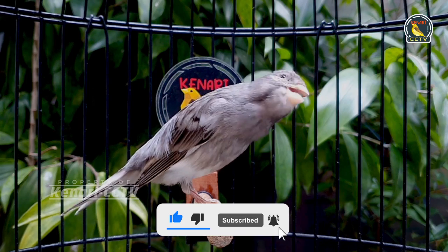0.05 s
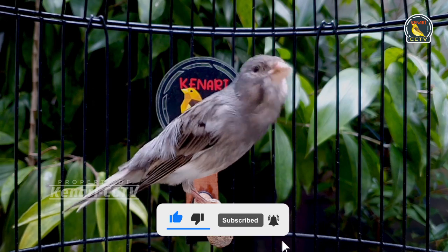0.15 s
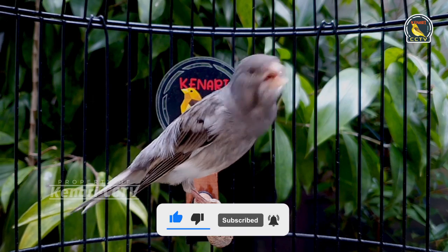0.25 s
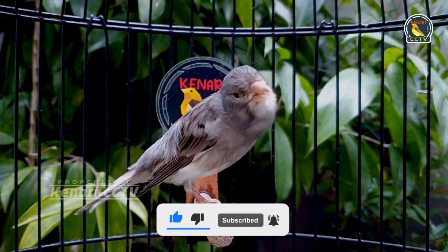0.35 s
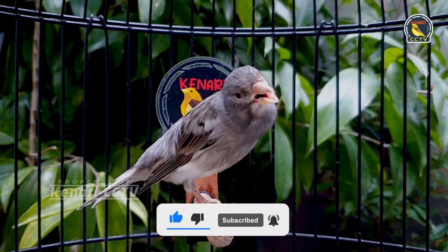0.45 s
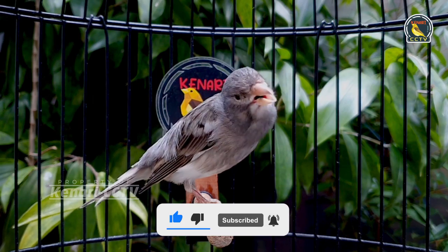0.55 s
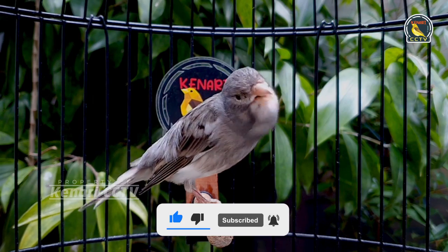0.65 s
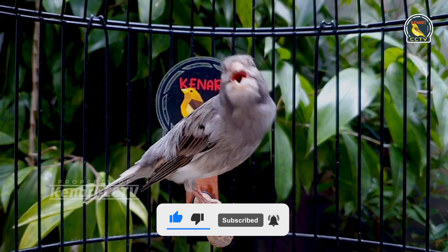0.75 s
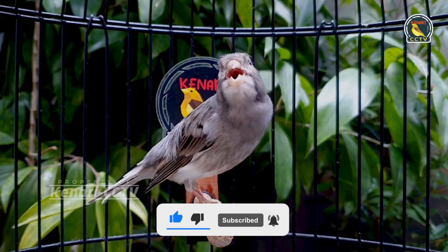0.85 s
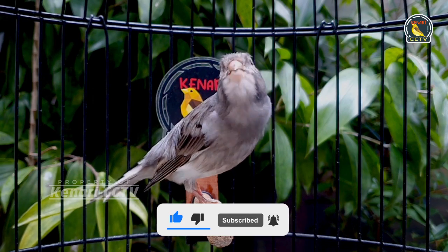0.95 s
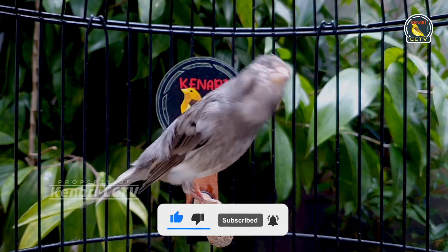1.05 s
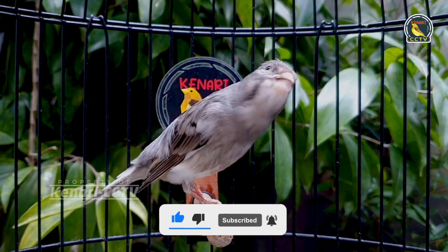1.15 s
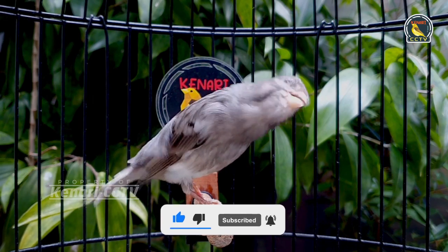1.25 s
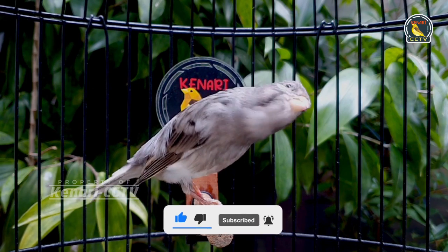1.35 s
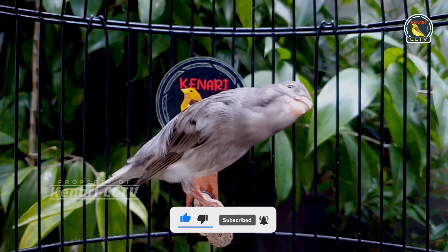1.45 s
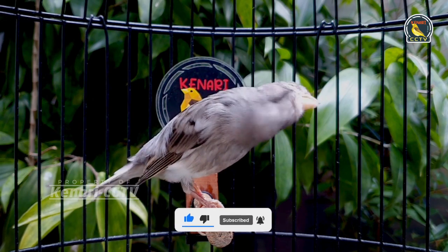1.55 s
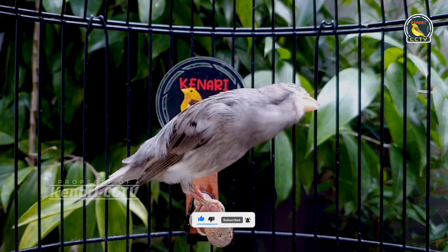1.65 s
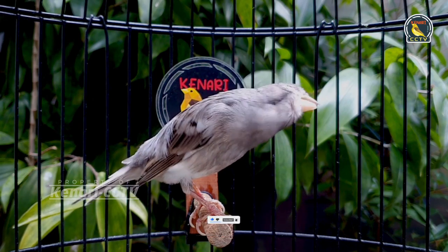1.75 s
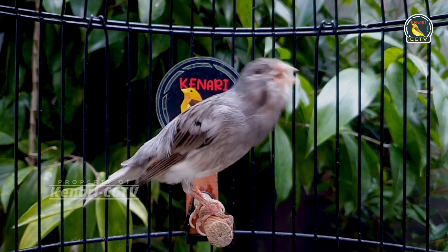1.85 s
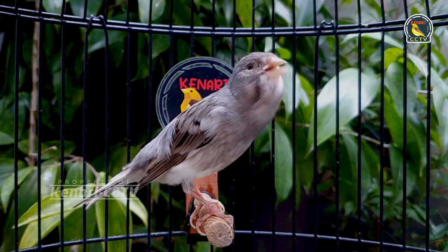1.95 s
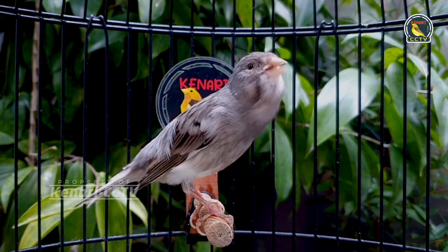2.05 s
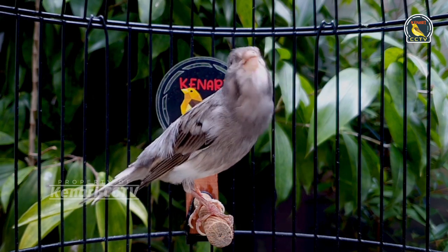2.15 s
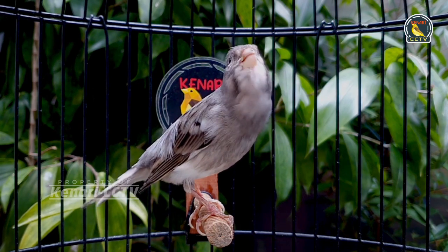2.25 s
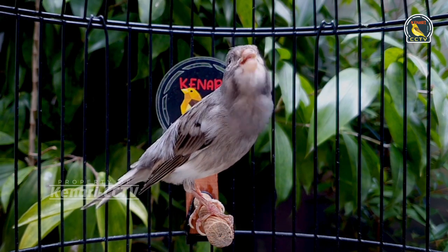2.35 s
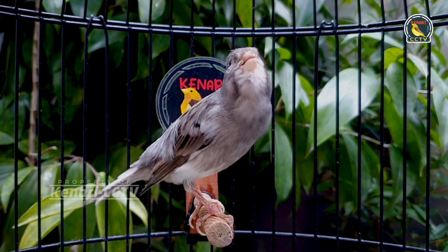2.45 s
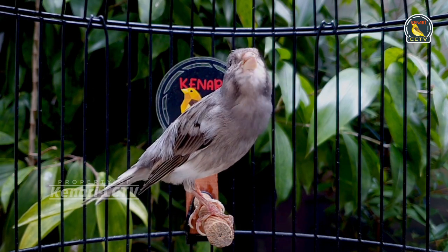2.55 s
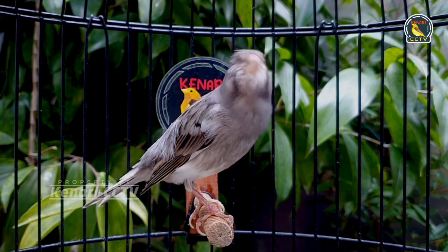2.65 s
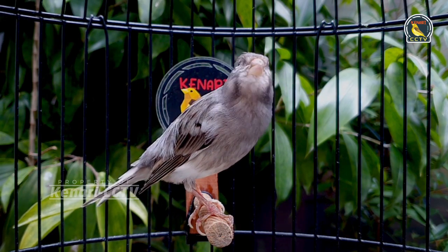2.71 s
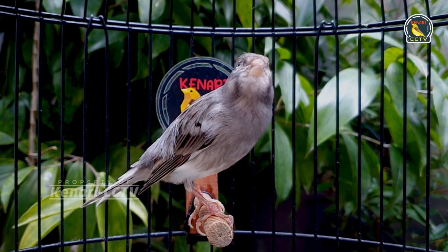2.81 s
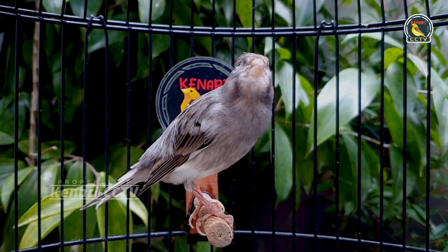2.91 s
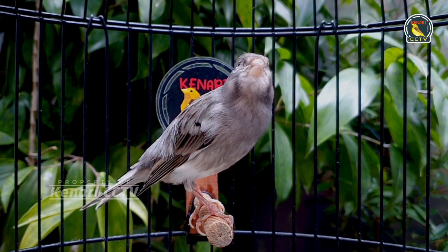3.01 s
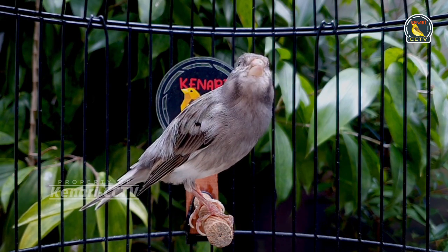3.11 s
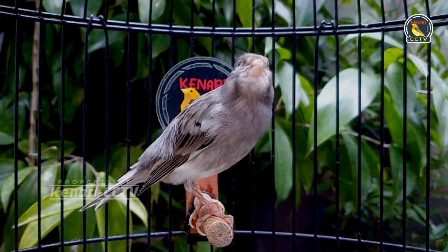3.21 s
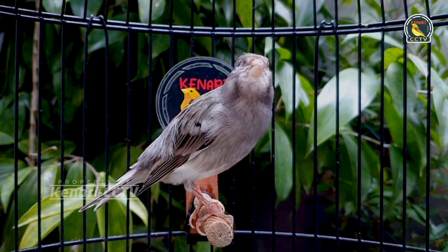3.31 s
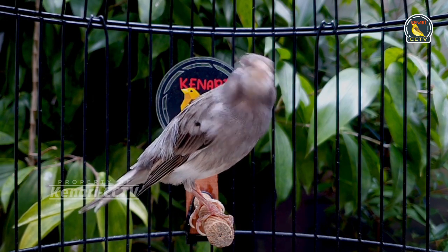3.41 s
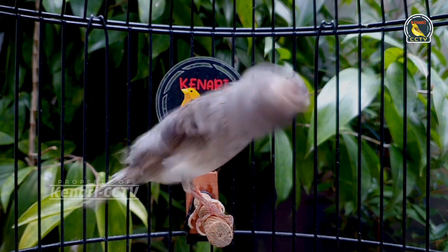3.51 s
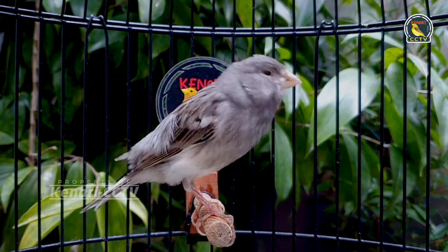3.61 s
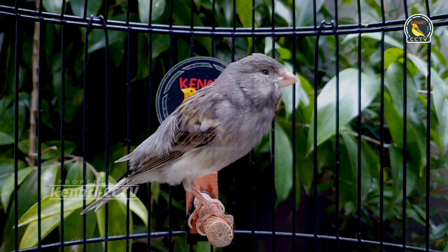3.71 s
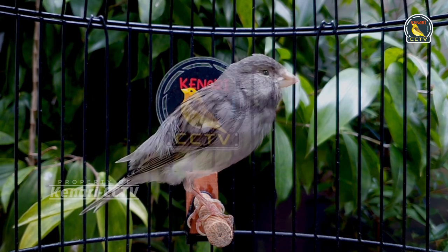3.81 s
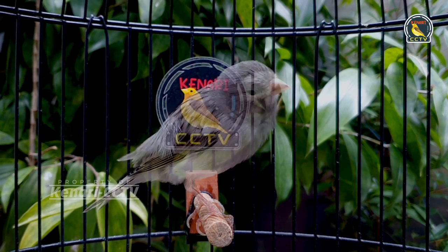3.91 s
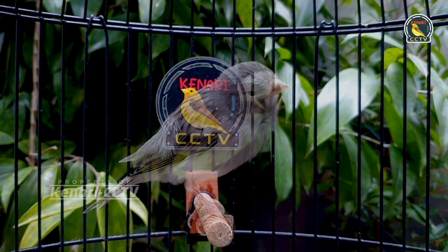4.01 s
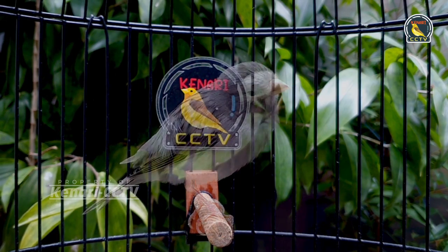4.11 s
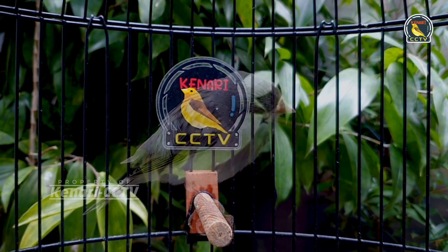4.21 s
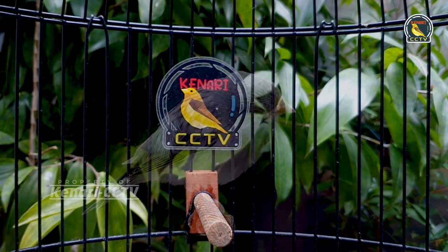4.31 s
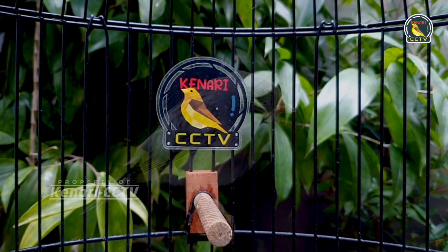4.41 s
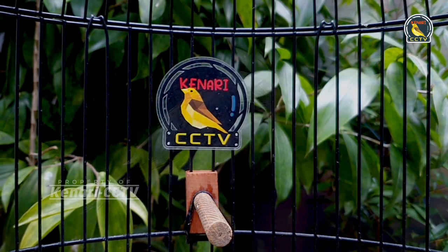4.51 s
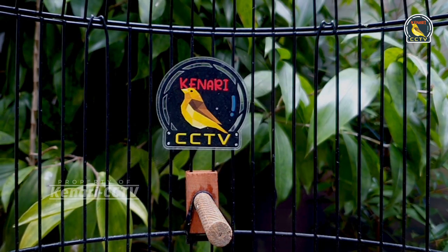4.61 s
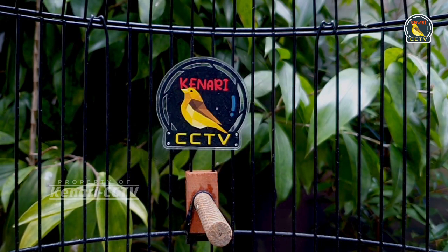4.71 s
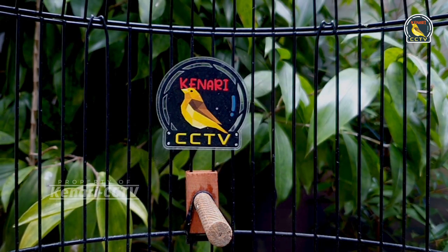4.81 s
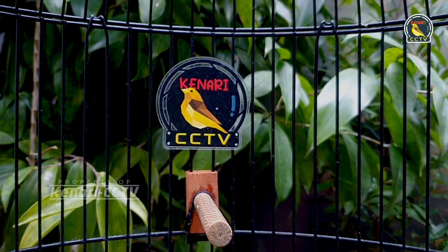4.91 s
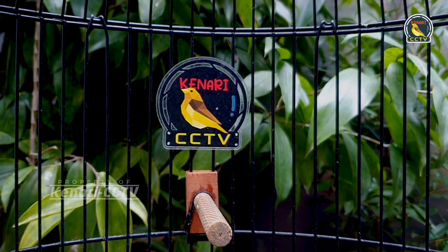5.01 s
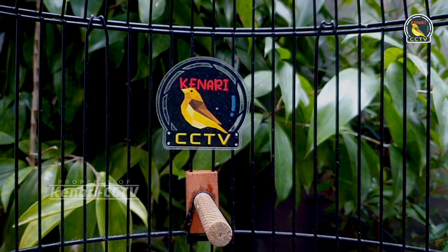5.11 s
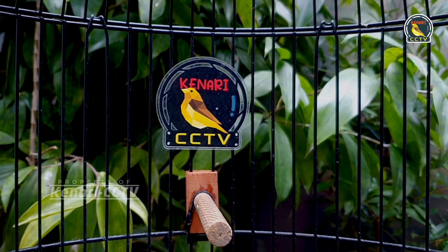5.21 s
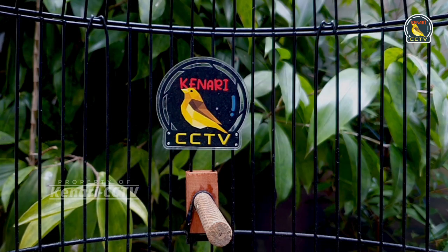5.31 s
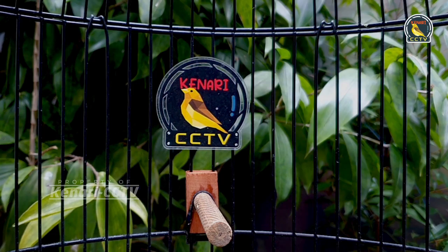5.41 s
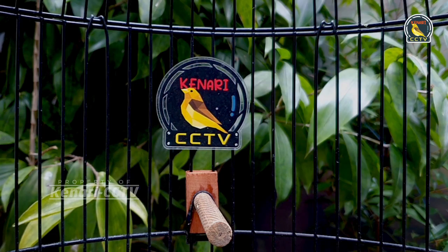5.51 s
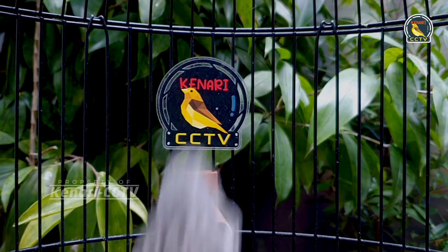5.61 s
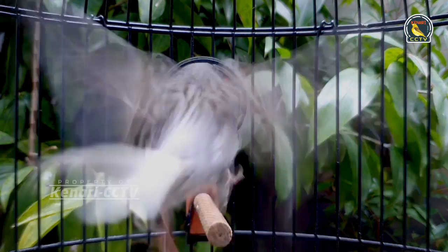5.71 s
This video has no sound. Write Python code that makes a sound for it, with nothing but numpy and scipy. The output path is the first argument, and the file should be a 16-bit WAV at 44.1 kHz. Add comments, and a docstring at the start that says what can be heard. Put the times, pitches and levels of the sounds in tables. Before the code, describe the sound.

A canary sings close by with falling sweeps and quick trills, then come dull cage knocks, a hoarse rising call and flapping wings.

```python
"""A canary sings close to the microphone, in a cage in a small, echoing room. Its voice organ makes
almost pure, gliding tones: falling sweeps, chips, a slow and a fast trill, a squeak and a held whistle.
In the pause the cage rustles, and knocks set its frame and wires ringing. Then come a hoarse rising
call, rich in overtones, and a flurry of wings whose draught buffets the microphone.
A low hum lies underneath."""
import sys
import numpy as np
from scipy import signal
from scipy.fft import rfft, irfft, next_fast_len
from scipy.io import wavfile
from scipy.ndimage import uniform_filter1d

SR = 44100
rng = np.random.default_rng(int(sys.argv[2]) if len(sys.argv) > 2 else 0)


def store_wav(level_fs):
    """Save 16-bit WAV to argv[1]."""
    pcm = np.round(np.clip(np.atleast_2d(level_fs), -1, 1) * 32767)
    wavfile.write(sys.argv[1], SR, pcm.T.astype(np.int16))


N = 254016
TIME = np.arange(N) / SR
LEAD = 8192   # samples before time zero, so the song is already sounding in the room


def from_db(db):
    """Turn decibels into a factor to multiply by."""
    return 10 ** (np.asarray(db) / 20)


def rms_one(x):
    """Scale a signal so that its average strength (rms) is 1."""
    return x / np.sqrt(np.mean(x ** 2) + 1e-20)


def at_hz(points, hz):
    """Read a table between its rows, with octaves evenly spaced."""
    f, value = np.transpose(points)
    return np.interp(np.log(np.maximum(hz, 1)), np.log(f), value)


def panned(x, balance_db):
    """Make stereo, with the left side louder than the right by balance_db."""
    return np.array([x * from_db(balance_db / 2), x * from_db(-balance_db / 2)])


def drift(rate_hz):
    """A smooth random wobble of typical size 1."""
    f = np.arange(N // 2 + 1) * SR / N
    return rms_one(irfft(rfft(rng.standard_normal(N)) / (1 + (f / rate_hz) ** 2), N))


def envelope(start_s, attack_s, end_s, release_s):
    """Rise smoothly, hold until end_s, then fade by 60 dB every release_s."""
    rise = np.sin(np.pi / 2 * np.clip((TIME - start_s) / attack_s, 0, 1)) ** 2
    return rise * from_db(-60 * np.maximum(TIME - end_s, 0) / release_s)


def bump(centre_s, width_s):
    """A bell-shaped rise and fall of height 1."""
    return np.exp(-((TIME - centre_s) / width_s) ** 2)


def noise(colour, alike, balance_db):
    """Stereo noise shaped by rows of (frequency [Hz], level [dB]); alike=1 gives both sides one wave."""
    f = np.arange(N // 2 + 1) * SR / N + 1
    roll_off = 1 + (.8 * colour[0][0] / f) ** 6 + (f / colour[-1][0] * .8) ** 6
    gain = from_db(at_hz(colour, f)) / roll_off
    mid, side = irfft(rfft(rng.standard_normal((2, N))) * gain, N)
    both = np.sqrt(1 + alike) * mid + np.sqrt(1 - alike) * side * [[1], [-1]]
    return rms_one(both * panned(np.ones(1), balance_db))


def harmonic(phase, hz, multiple):
    """A tone at a whole multiple of the pitch, faded out where it is too high to hear."""
    return np.sin(multiple * phase) * np.clip((20000 - multiple * hz) / 3000, 0, 1)


def background(hum_rest_db, rumble_rest_db, hiss_db):
    """A low hum and a murky rumble swell under the song and as the bird shifts, over faint hiss."""
    # tone colours of the three noises: (frequency [Hz], relative level [dB])
    hum_colour = [(15, -47.5), (25, -12), (49, -6), (70, 3), (92, 0.5), (123, -5.5), (140, -11.5),
                  (162, -19.5), (250, -27), (320, -47.5), (550, -120)]
    rumble_colour = [(120, -11.5), (190, -0.5), (270, 1), (380, -9), (480, -9), (650, -20), (1000, -31)]
    hiss_colour = [(500, 5.5), (1000, -6.5), (4000, -7), (9000, -17.5), (16000, -37.5)]
    # swells of the low noise: (start [s], end [s], hum [dB], rumble [dB])
    stirs = [(-.1, 2.6, -59, -76.5), (2.0, 2.28, -51.5, -74.5), (3.579, 3.7, -45.5, -61),
             (3.93, 4.4, -52, -54), (4.5, 5.8, -63, -63.5), (4.97, 5.14, -55.5, -66.5)]
    hum_power, rumble_power = from_db(hum_rest_db) ** 2, from_db(rumble_rest_db) ** 2
    for start, end, hum_db, rumble_db in stirs:
        swell = envelope(start, attack_s=.08, end_s=end, release_s=1.4)
        hum_power += (swell * from_db(hum_db)) ** 2
        rumble_power += (swell * from_db(rumble_db)) ** 2
    hum = np.sqrt(hum_power) * noise(hum_colour, alike=.49, balance_db=-11.5)
    rumble = np.sqrt(rumble_power) * noise(rumble_colour, alike=.1, balance_db=-10)
    return hum + rumble + from_db(hiss_db) * noise(hiss_colour, alike=.1, balance_db=0)


def sing(shape, notes, overtones_db, hiss_db, waver, flutter_db):
    """Each note is a pure gliding tone with faint overtones; a faint broad hiss sounds along with it."""
    # how the beak filters the overtones: (frequency [Hz], gain [dB])
    beak = [(3000, 0), (4200, -7.5), (5000, -7), (7000, -14.5), (8300, 3), (12000, 4), (14000, -1.5),
            (15500, 7)]
    # the highest notes beam to the left: (pitch [Hz], left minus right [dB])
    beam = [(1500, 0.5), (3100, 1), (4100, 0.5), (5000, 2), (6200, -1.5), (7600, 10.5)]
    out, time = np.zeros((2, LEAD + N)), np.arange(-LEAD, N) / SR
    shape_s, shape_hz, shape_db = np.transpose(shape)
    wobble, flutter = drift(210), drift(120)
    hiss = noise([(5500, -2.5), (7000, -12), (9000, -1.5), (15000, -5.5)], alike=.29, balance_db=2)
    for start, ratio, level_db, balance_db in notes:
        at = np.flatnonzero((time > start + shape_s[0]) & (time < start + shape_s[-1]))
        t = time[at] - start
        glide = uniform_filter1d(np.interp(t, shape_s, shape_hz), size=90)
        hz = ratio * glide * (1 + waver * wobble[at])
        to_edge_s = np.minimum(t - shape_s[0], shape_s[-1] - t)
        fade = np.sin(np.pi / 2 * np.clip(to_edge_s / .0025, 0, 1)) ** 2
        loudness = fade * from_db(np.interp(t, shape_s, shape_db) + level_db + flutter_db * flutter[at])
        phase = 2 * np.pi * np.cumsum(hz) / SR
        tone = panned(np.sin(phase), balance_db + at_hz(beam, hz))
        note_hiss = from_db(hiss_db + rng.normal(0, 2.6)) * hiss[:, at]
        overtones = sum(from_db(db + at_hz(beak, k * hz)) * harmonic(phase, hz, k)
                        for k, db in enumerate(overtones_db, 2))
        overtones = panned(overtones * from_db(rng.normal(0, .98)), balance_db=9)
        out[:, at] += loudness * (tone + overtones + note_hiss)
    return out


def falling_shape(loudness, top_hz, hold_s, octaves_per_s, length_s,
                  plunge_share, plunge_s, scoop_share, scoop_s):
    """A note scoops up, bends into an even fall, then plunges: (time [s], pitch [Hz], level [dB])."""
    t = np.linspace(0, length_s, 80)
    scoop = 1 - scoop_share * np.exp(-t / scoop_s)
    plunge = 1 - plunge_share * np.exp((t - length_s) / plunge_s)
    octaves_down = octaves_per_s * (t - hold_s * np.tanh(t / hold_s))
    hz = top_hz * scoop * plunge * 2 ** -octaves_down
    return np.transpose([t, hz, at_hz(loudness, hz)])


def near_wall(x, delay_s, echo_db):
    """One strong, close echo boosts some pitches and weakens others, so a glide swells and dips."""
    echo = np.pad(x, ((0, 0), (round(delay_s * SR), 0)))[:, :x.shape[1]]
    return x + from_db(echo_db) * echo


def falling_notes():
    """Three quick sweeps and two slower slides, each loudest where the throat carries it best."""
    # how well the throat carries each pitch: (pitch [Hz], level [dB])
    sweep_loudness = [(1240, -51.5), (2200, -25.5), (2800, -16.5), (3650, -8.5), (4250, -16.5), (5000, -13),
                      (5750, -11.5), (6500, -29), (7700, -28.5)]
    slide_loudness = [(4300, -29.5), (4550, -12), (4850, -11), (5300, -16.5), (5800, -22.5), (6400, -31),
                      (7700, -25.5)]
    # notes sung: (time [s], pitch ratio, level [dB], left minus right [dB])
    sweep_notes = [(-.110, 0.98, 2, 0), (0.096, 1.002, 0.5, 0.5), (0.297, 1.01, -.5, -1)]
    slide_notes = [(0.497, 0.996, -1.3, 0.52), (0.771, 1.004, 1, 1.5)]
    # harmonics before the beak filters them: (2nd [dB], 3rd [dB], 4th [dB])
    sweep_overtones = [-31, -35, -41]
    slide_overtones = [-29, -35, -60]
    sweep = falling_shape(sweep_loudness, top_hz=7708, hold_s=.012, octaves_per_s=11.7, length_s=.147,
                          plunge_share=.52, plunge_s=.0097, scoop_share=.1, scoop_s=.0036)
    slide = falling_shape(slide_loudness, top_hz=7752, hold_s=.025, octaves_per_s=3.91, length_s=.2,
                          plunge_share=.05, plunge_s=.018, scoop_share=.03, scoop_s=.0033)
    sweeps = sing(sweep, sweep_notes, sweep_overtones, hiss_db=-35.5, waver=.0031, flutter_db=2)
    slides = sing(slide, slide_notes, slide_overtones, hiss_db=-51.5, waver=.002, flutter_db=1.5)
    return near_wall(sweeps + slides, delay_s=.00178, echo_db=-9)


def chips():
    """A tiny, steeply falling chip follows each slide."""
    # one chip: (time in the note [s], pitch [Hz], level [dB])
    shape = [(0, 4400, -33), (.003, 3750, -14), (.005, 3400, -17), (.009, 2620, -39)]
    # chips sung: (time [s], pitch ratio, level [dB], left minus right [dB])
    notes = [(.712, 1.031, 2, 0.0057), (0.9885, 1.001, -4, 0)]
    return sing(shape, notes, overtones_db=[-35, -32, -42], hiss_db=-33, waver=.003, flutter_db=1.5)


def slow_trill():
    """The voice flicks upward seven times in a row."""
    # one flick: (time in the note [s], pitch [Hz], level [dB])
    shape = [(-.026, 948, -64), (-.017, 1589, -31), (-.008, 2115, -31.5), (0, 3138, -32),
             (.003, 3750, -21.5), (.007, 3933, -6.5), (.011, 4130, -4.5), (.015, 4300, -8),
             (.021, 4370, -24.5)]
    # flicks sung: (time [s], pitch ratio, level [dB], left minus right [dB])
    notes = [(1.0611, 0.96, -3, 0), (1.137, 0.98, -1, 1), (1.213, 1.01, -2, -0.21),
             (1.286, 1.015, -1.5, -1), (1.3658, 1.0, 0.5, 0), (1.4425, 1.046, -1, -0.2),
             (1.513, 0.99, -0.5, -1)]
    return sing(shape, notes, overtones_db=[-35, -38, -60], hiss_db=-48, waver=.012, flutter_db=1.44)


def fast_trill(start_s, period_s, count, balance_db):
    """Quick flicks on a steady beat; as the bird tires, they come later, flatter and softer."""
    # one flick: (time in the note [s], pitch [Hz], level [dB])
    shape = [(-.013, 1637, -53.5), (-.006, 2381, -22), (-.003, 2895, -12), (0, 3190, -13),
             (.003, 3505, -7.5), (.006, 3920, -7), (.009, 4080, -3), (.012, 4196, -6.5),
             (.016, 4240, -30.5)]
    # one faint closing flick: (time [s], pitch ratio, level [dB], left minus right [dB])
    afternote = [(2.393, 0.86, -19.5, -1)]
    late_s, flat_share, loss_db = .0135, .02, 1.5   # what tiredness does to the last beat
    k = np.arange(count)
    tired = (k / k[-1]) ** 4
    pitch_chance, level_chance = rng.standard_normal((count, 2)).T
    times = start_s + period_s * k + late_s * tired
    ratios = 1 - flat_share * tired + .008 * pitch_chance
    levels_db = -1.97 - loss_db * tired + .7 * level_chance
    notes = [(s, ratio, db, balance_db) for s, ratio, db in zip(times, ratios, levels_db)] + afternote
    return sing(shape, notes, overtones_db=[-36, -35, -47], hiss_db=-38.5, waver=.0079, flutter_db=1.31)


def squeak_and_whistle():
    """A high squeak leads into a whistle held on almost one pitch."""
    # note shapes: (time in the note [s], pitch [Hz], level [dB])
    squeak_shape = [(0, 5470, -34), (.007, 5860, -35.5), (.015, 6520, -23), (.022, 6300, -31.5),
                    (.032, 6200, -42.5)]
    whistle_shape = [(0, 3130, -41.5), (.012, 3162, -25), (.024, 3144, -15), (.055, 3103, -21),
                     (.110, 3092, -22), (.132, 3064, -26.5), (.150, 3080, -44)]
    # notes sung: (time [s], pitch ratio, level [dB], left minus right [dB])
    squeaks = [(2.428, 0.98, 0.0024, -2)]
    whistles = [(2.451, 1.0, 0.0065, -1.5)]
    squeak = sing(squeak_shape, squeaks, overtones_db=[-18], hiss_db=-28, waver=.0072, flutter_db=2)
    whistle = sing(whistle_shape, whistles, overtones_db=[-18.5, -31, -39, -52],
                   hiss_db=-48.5, waver=.0022, flutter_db=.8)
    return squeak + whistle


def struck(tones, times, levels_db):
    """Each blow sets off ringing tones that die away, each with a slightly random strength."""
    out = np.zeros(N)
    for hz, tone_db, ring_s in tones:
        blows = np.full(N, 1e-18)
        blows[(times * SR).astype(int)] = from_db(levels_db + tone_db + rng.normal(0, .77, len(times)))
        decay, turn = from_db(-60 / (ring_s * SR)), 2 * np.pi * hz / SR   # both per sample
        out += signal.lfilter([0, np.sin(turn)], [1, -2 * decay * np.cos(turn), decay * decay], blows)
    return out


def cage(start_s, attack_s, rustle_db, wire_db, tick_db, tick_s):
    """A short rustle, then dull knocks on the frame that set the wires ticking."""
    # tone colour of the rustle: (frequency [Hz], relative level [dB])
    rustle_colour = [(350, -49), (600, -18), (734, 4), (1040, -44), (1440, -6.5), (1670, -36.5),
                     (2430, -15.5), (3060, -31.5), (3650, -21.5), (7550, -32), (15000, -30)]
    # knocks on the cage: (time [s], thud [dB], wires [dB])
    knocks = [(3.925, -60.5, -85), (3.994, -52.5, -86.5), (4.045, -56, -88), (4.166, -53, -55),
              (4.324, -58, -63)]
    # ringing tones of frame and wires: (frequency [Hz], level [dB], time to fade by 60 dB [s])
    frame_tones = [(74.7, -10, 0.48), (94, 6.5, 0.48), (206, -28, .4), (272, -3, 1.0), (338, -18, 0.34),
                   (442, -11, 0.64), (716, -19, 0.36), (934, -22, 0.42), (1266, -25.5, 0.33)]
    wire_tones = [(3480, -2, 0.11), (3980, -4.5, 0.083), (4660, -18, .12), (4660, -2, .1), (5100, -1, 0.1)]
    tick_colour = [(900, 11), (2800, -12), (3600, 8), (5000, -1), (6500, -14), (11000, -30)]
    times, thuds_db, wires_db = np.transpose(knocks)
    brush = envelope(start_s, attack_s, end_s=start_s + attack_s, release_s=.29)
    rustle = brush * from_db(rustle_db + 2.2 * drift(96)) * noise(rustle_colour, alike=.24, balance_db=-3)
    contact = sum(from_db(db + tick_db) * (TIME > s) * np.exp(-abs(TIME - s) / tick_s)
                  for s, db in zip(times, wires_db))
    ticks = contact * noise(tick_colour, alike=.11, balance_db=0)
    thuds = panned(struck(frame_tones, times, thuds_db), balance_db=-23)
    return rustle + ticks + thuds + struck(wire_tones, times, wires_db + wire_db)


def rising_call(start_s, end_s, waver, tremor_db, shimmer_db):
    """A hoarse, unsteady call; each harmonic swells as it crosses a pitch where the throat rings."""
    # the climb of the call: (time [s], pitch [Hz])
    climb = [(5.0, 1318), (5.012, 1381), (5.04, 1627), (5.056, 1710), (5.11, 1839), (5.14, 1997),
             (5.198, 2114), (5.22, 2100), (5.276, 2373), (5.312, 2369), (5.328, 2530), (5.38, 2631),
             (5.42, 2621)]
    # how the throat filters the voice: (frequency [Hz], gain [dB])
    throat = [(1300, -4.5), (2000, -21.5), (2600, -3), (2850, -2), (3200, -6), (3500, 2.5), (4350, 2.5),
              (4700, -2.5), (5150, -5), (5650, -23), (6300, -23.5), (7200, -40), (8300, -40), (10200, -25),
              (12500, -37), (15500, -41)]
    rasp_colour = [(2600, -12.5), (3500, 4.5), (4400, 5.5), (5300, -3.5), (7000, -24),
                   (10500, -18), (15000, -18)]
    hz = np.interp(TIME, *np.transpose(climb)) * (1 + waver * drift(170))
    phase = 2 * np.pi * np.cumsum(hz) / SR
    swell_db = 6.5 * bump(centre_s=5.2, width_s=.087)
    catch_db = -17 * bump(centre_s=5.306, width_s=.0043)   # the voice catches once
    level_db = -28 + swell_db + catch_db + tremor_db * drift(35)
    strain = bump(centre_s=5.29, width_s=.037)
    tone = np.zeros(N)
    for k in range(1, 12):
        strain_db = strain * (12.5 if k > 3 else -4)   # strain lifts high harmonics and chokes low ones
        harmonic_db = at_hz(throat, k * hz) + strain_db + shimmer_db * drift(76)
        tone += from_db(harmonic_db) * harmonic(phase, hz, k)
    rasp_db = -10.5 - 28 * np.maximum(TIME - start_s, 0)   # the rasp clears as the pitch climbs
    rasp = from_db(rasp_db) * noise(rasp_colour, alike=.35, balance_db=0)
    loudness = envelope(start_s, attack_s=.031, end_s=end_s, release_s=.026) * from_db(level_db)
    return loudness * (panned(np.sqrt(2) * tone, balance_db=2.5) + rasp)


def wing_draught(start_s, attack_s, level_db):
    """Air pushed by the wings buffets the microphone with a deep rumble."""
    # tone colour of the draught: (frequency [Hz], relative level [dB])
    colour = [(28, -29), (42, 3.5), (55, -0.5), (72, -2), (100, -0.5), (170, -21.5), (270, -10),
              (400, -29.5), (800, -39), (2000, -46)]
    rise = envelope(start_s, attack_s, end_s=TIME[-1], release_s=1)
    return from_db(level_db) * rise * noise(colour, alike=.14, balance_db=-8)


def wings(swish_s, grain_db):
    """Each wingbeat is a grainy swish of feathers."""
    # feather swishes: (time [s], level [dB])
    flaps = [(5.51, -66), (5.534, -52.5), (5.573, -46), (5.597, -48.5), (5.615, -45), (5.646, -49),
             (5.751, -46.5)]
    # tone colour of the feathers: (frequency [Hz], relative level [dB])
    feathers = [(290, -8), (500, 3), (1750, -10.5), (2530, -11.5), (2720, -16), (4110, -14), (7260, -26),
                (10700, -20), (15000, -28)]
    beats = sum(from_db(db) / (1 + ((TIME - s) / swish_s) ** 4) for s, db in flaps)
    return beats * from_db(grain_db * drift(266)) * noise(feathers, alike=.147, balance_db=-1.2)


def from_left(x, lag_ms):
    """Sound from the left reaches the right microphone a little later."""
    size = next_fast_len(x.shape[1])
    f = np.arange(size // 2 + 1) * SR / size
    delay = np.exp(-2j * np.pi * f * lag_ms / 1000)
    right = irfft(rfft(x[1], size) * delay, size)[:x.shape[1]]
    return np.array([x[0], right])


def room(x, right_db, build_s):
    """Add a few close echoes, then a wash of blurred ones that lasts longest in the bass."""
    # echoes off nearby surfaces: (left delay [s], left level [dB], right delay [s], right level [dB])
    echoes = [(.0023, -26, 0.0037, -11.5), (.0068, -18.5, 0.0083, -17.5), (0.0147, -17.5, 0.0059, -20),
              (0.0203, -23.5, 0.048, -23)]
    # how long the room rings: (frequency [Hz], time to fade by 60 dB [s])
    ring_times = [(300, 0.59), (1500, 0.21), (3200, 0.47), (5000, .47), (8000, 0.37), (15000, 0.28)]
    # how strongly it rings: (frequency [Hz], level [dB])
    ring_levels = [(300, -4.5), (1500, -11.5), (3200, -11.5), (4300, -12), (6000, -15.5), (8000, -20.5),
                   (15000, -7)]
    size = next_fast_len(LEAD + N + SR)
    f, t = np.arange(size // 2 + 1) * SR / size, TIME[:SR]
    near = sum(np.array([from_db(l_db) * np.exp(-2j * np.pi * f * l_s),
                         from_db(r_db) * np.exp(-2j * np.pi * f * r_s)])
               for l_s, l_db, r_s, r_db in echoes)
    tail, band_edges = np.zeros((2, SR)), np.geomspace(150, 18000, 13)
    build_up = 1 - np.exp(-(t / build_s) ** 2)
    for low, high in zip(band_edges, band_edges[1:]):
        hz = np.sqrt(low * high)
        band_filter = signal.butter(2, [low, high], "band", fs=SR, output="sos")
        band = signal.sosfilt(band_filter, rng.standard_normal((2, SR)))
        decay = from_db(-60 * t / at_hz(ring_times, hz)) * build_up
        tail += band * decay / np.linalg.norm(decay) * from_db(at_hz(ring_levels, hz))
    wash = rfft(tail * panned(np.ones(1), -right_db), size)
    return irfft(rfft(x, size) * (1 + near + wash), size)[:, LEAD:LEAD + N]


def scene():
    """Bird and cage sound into the room; the draught and the background get no echo."""
    call = rising_call(start_s=4.998, end_s=5.412, waver=.00413, tremor_db=1.3, shimmer_db=2)
    movement = cage(start_s=3.912, attack_s=.039, rustle_db=-50, wire_db=-5.5, tick_db=-2.5, tick_s=.046)
    movement += wings(swish_s=.011, grain_db=3)
    draught = wing_draught(start_s=5.482, attack_s=.17, level_db=-30)
    song = falling_notes() + chips() + slow_trill()
    song += fast_trill(start_s=1.578, period_s=.0462, count=17, balance_db=-1.5)
    song += squeak_and_whistle()
    after_song = np.pad(from_left(call, lag_ms=.17) + movement, ((0, 0), (LEAD, 0)))
    in_room = room(from_left(song, lag_ms=.055) + after_song, right_db=4, build_s=.0062)
    return in_room + draught + background(hum_rest_db=-70, rumble_rest_db=-79, hiss_db=-83.5)


def record(dry):
    """Fade in very quickly and cut off the highest treble steeply."""
    fade_s, cutoff_hz = .001, 15900
    fade = np.sin(np.pi / 2 * np.minimum(TIME / fade_s, 1)) ** 2
    return signal.sosfilt(signal.ellip(10, .1, 80, cutoff_hz, fs=SR, output="sos"), dry * fade)


dry = scene()
out = record(dry)
store_wav(out)
```